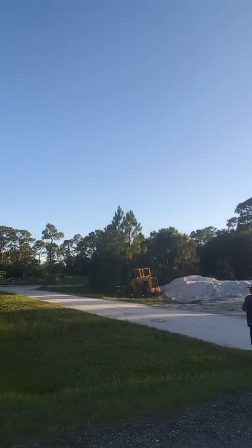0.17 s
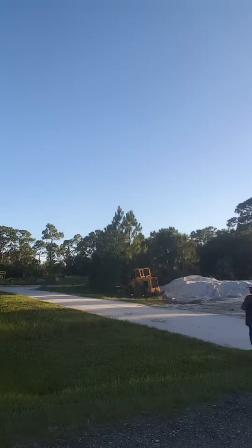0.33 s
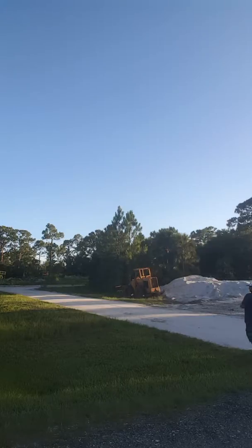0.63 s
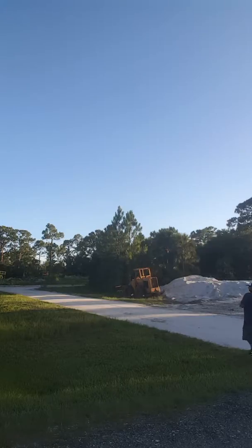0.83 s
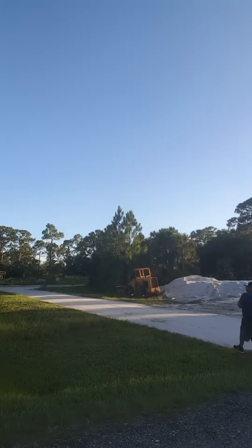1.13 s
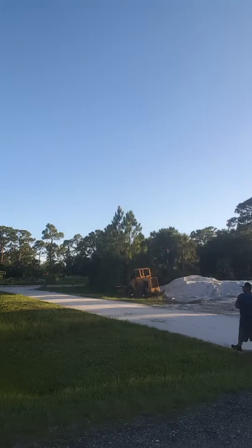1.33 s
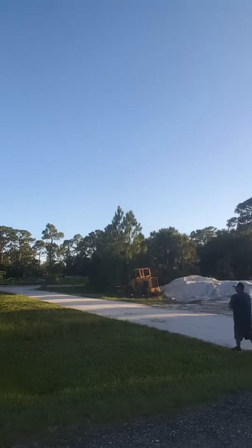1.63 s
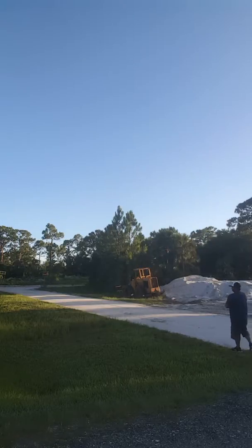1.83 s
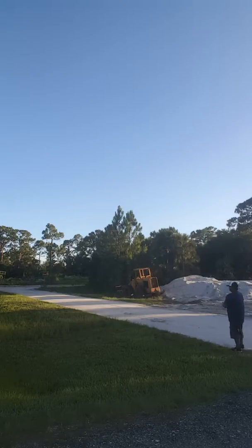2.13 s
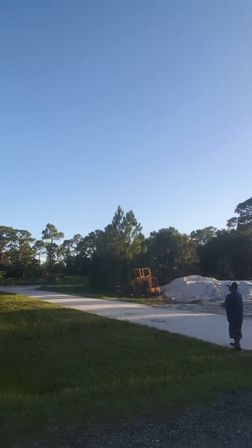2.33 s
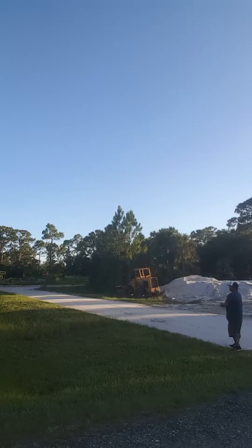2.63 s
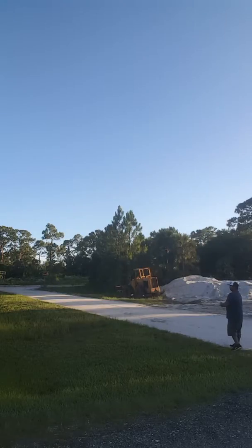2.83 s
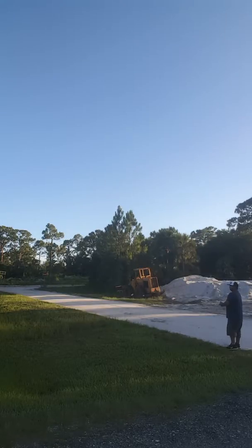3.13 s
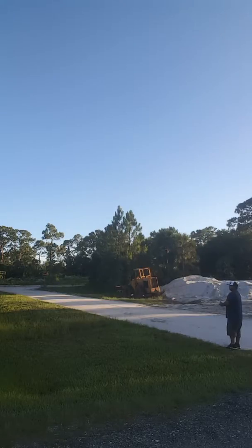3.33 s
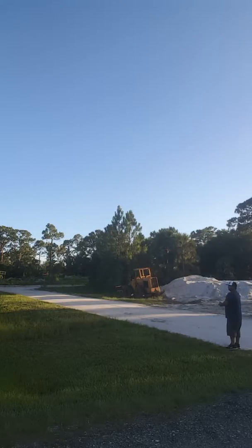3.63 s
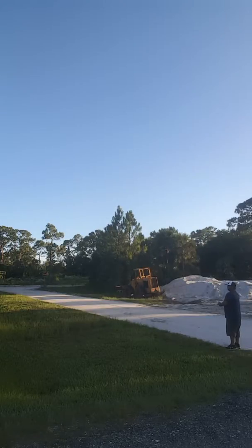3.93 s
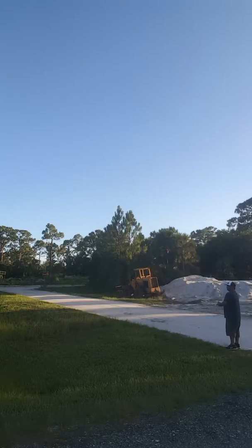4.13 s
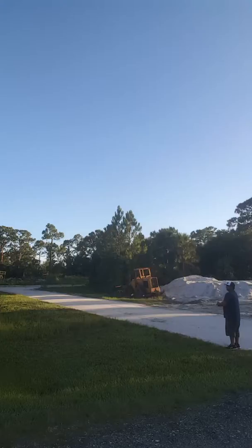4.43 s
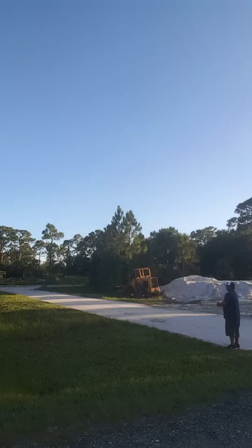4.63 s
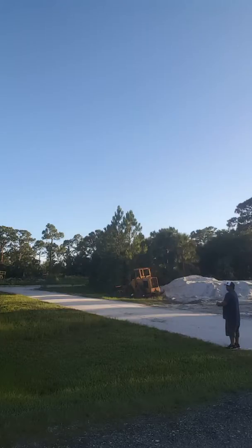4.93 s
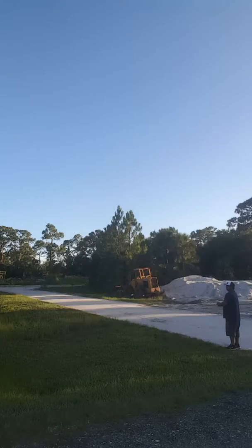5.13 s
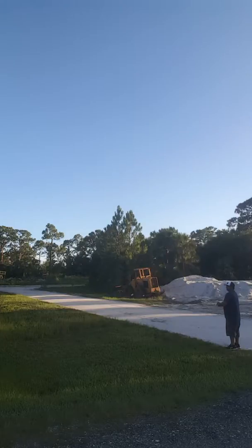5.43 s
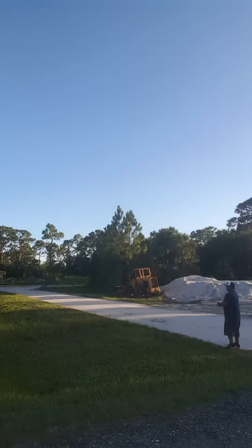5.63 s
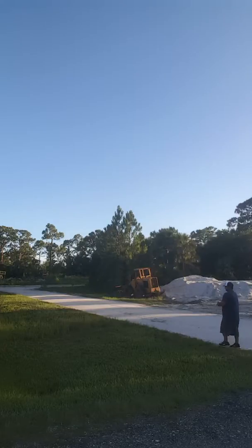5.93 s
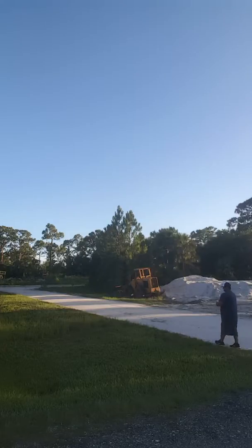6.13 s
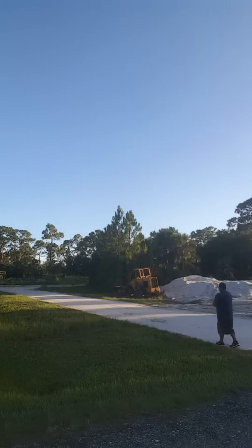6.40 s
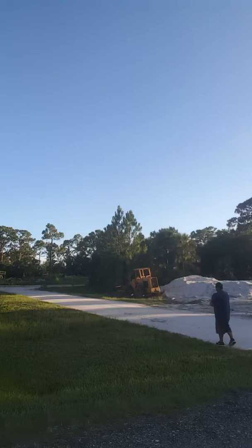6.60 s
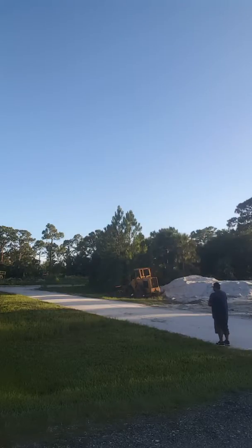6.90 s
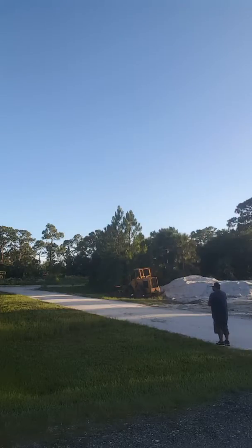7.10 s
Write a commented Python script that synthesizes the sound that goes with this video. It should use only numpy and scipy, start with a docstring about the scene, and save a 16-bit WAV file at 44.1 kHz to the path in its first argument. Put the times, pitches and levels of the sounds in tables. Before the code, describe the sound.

In an open field, a slate friction call close to the microphone makes short, hollow, raspy clucks, irregularly spaced, then from about four seconds a steady run of longer yelps breaking from high to low. Trees return a faint diffuse echo. Behind are a soft distant traffic rush, low engine hum, pulsing insects and tiny bird whistles. After the run, gravel crunches underfoot, and one faint cluck ends it.

```python
"""A wooden striker sticks and slips across a slate pot call in an open field: clucks, then a run of yelps.
The rubbed slate and its hollow pot color each note, and a tree line some metres away answers it.
Behind it: a far rush, hum and engine made of noise and wavering tones, and far insects made of noise bands.
A clicking cicada, a chirring cricket, a whistling bird and a few crunching gravel steps fill the evening."""
import sys
import numpy as np
from scipy import signal
from scipy.fft import rfft, irfft, next_fast_len
from scipy.io import wavfile
from scipy.ndimage import uniform_filter1d, map_coordinates

SR = 44100
rng = np.random.default_rng(int(sys.argv[2]) if len(sys.argv) > 2 else 0)


def dump(signal):
    """Clip the signal to [-1, 1] and save it as 16-bit WAV at the path in sys.argv[1]."""
    limited = np.clip(np.atleast_2d(signal).T, -1, 1)
    pcm = np.round(limited * 32767).astype(np.int16)
    wavfile.write(sys.argv[1], SR, pcm)


N = 320166
TIME = np.arange(N) / SR


def amp(db):
    """Turn decibels into a gain."""
    return 10 ** (np.asarray(db) / 20)


def unit(x):
    """Scale a sound to an rms (average strength) of 1."""
    return x / np.sqrt(np.mean(x ** 2) + 1e-20)


def along(points, hz):
    """Read a (frequency, value) table at any frequency, on a log frequency axis."""
    point_hz, value = np.transpose(points)
    return np.interp(np.log(hz + 1), np.log(point_hz + 1), value)


def curves(rows, t):
    """Read a table at the times t: one curve for each column after the first."""
    row_time, *columns = np.transpose(rows)
    return [np.interp(t, row_time, column) for column in columns]


def wobble(rate, size=N):
    """Make a smooth random curve with `rate` random points a second."""
    points = rng.standard_normal(int(size * rate / SR) + 4)
    return map_coordinates(points, [np.arange(size) * rate / SR])


def sine(hz):
    """A sine whose pitch follows the curve hz: adding up the pitch gives the phase."""
    return np.sin(2 * np.pi * np.cumsum(hz) / SR)


def filtered(x, response):
    """Multiply the spectrum of x by a response, given as a function of frequency."""
    size = next_fast_len(N + SR // 2)
    spectrum = rfft(x, size) * response(np.fft.rfftfreq(size, 1 / SR))
    return irfft(spectrum, size)[..., :N]


def band(x, centre_hz, width_hz):
    """Keep a band around one frequency, by applying the same resonance twice."""
    def resonance(f):
        damping = 1j * f * width_hz
        return (damping / (centre_hz ** 2 - f * f + damping)) ** 2
    return unit(filtered(x, resonance))


def placed(x, pan_db):
    """Place a sound between left and right; a positive pan makes the left louder."""
    return x * amp([[pan_db / 2], [-pan_db / 2]])


# Color of far traffic and leaves: (frequency [Hz], relative level [dB per Hz])
FIELD_COLOR = [(15, -44.5), (30, -17.5), (60, -5), (120, -5), (250, -8.5), (450, -15.5), (800, -18.5),
               (1600, -20.5), (3270, -27), (4500, -27), (6080, -36.5), (9350, -44), (15600, -49.5)]
# How alike left and right are: (frequency [Hz], likeness [0 to 1])
FIELD_LIKENESS = [(30, 0.93), (70, .96), (130, 0.97), (290, 0.95), (640, 0.77), (1410, .37), (3100, 0),
                  (15000, 0)]


def field():
    """Far traffic and leaves: colored noise, nearly mono in the bass, with slow patches."""
    spectrum = signal.stft(rng.standard_normal((2, N)), nperseg=512)[2]
    patches = rng.standard_normal(spectrum.shape[1:])
    patches = uniform_filter1d(patches, 6, 0)  # smooth across frequency
    patches = uniform_filter1d(patches, 14, 1)  # smooth across time
    pair = signal.istft(spectrum * amp(1.2 * unit(patches)), nperseg=512)[1][:, :N]

    def mid_side_gain(hz):
        # Shares of the common part (mid) and the left-right difference (side)
        angle = np.arccos(np.clip(along(FIELD_LIKENESS, hz), -1, 1)) / 2
        return amp(along(FIELD_COLOR, hz)) * [np.cos(angle), np.sin(angle)]

    mid, side = filtered(pair, mid_side_gain)
    level_db = -54 + 0.23 * wobble(0.91)
    return amp(level_db) * unit(np.array([mid + side, mid - side]))


def drone(hz, db):
    """A tone that wavers in pitch and strength on its long way through the air."""
    pitch_hz = hz * (1 + .008 * wobble(12))
    return amp(db + 2.5 + 2.53 * wobble(8)) * sine(pitch_hz)


# Hum lines of a far machine: (frequency [Hz], level before the drone's lift [dB])
HUM_LINES = [(120, -61), (204, -71), (240, -59), (280, -72.5), (333, -72)]
# A far engine, before the trims below: (time [s], first order level [dB], second order level [dB])
ENGINE_LEVELS = [(0.0, -61, -78), (0.75, -58.5, -58), (1.84, -59, -66), (2.32, -64.5, -71),
                 (3.84, -67.5, -68.5), (4.85, -60.5, -61), (6.09, -60, -59.5), (6.55, -60, -71),
                 (7.26, -68, -62)]


def machines():
    """Steady hum lines, and two engine orders (the second near twice the first) that come and go."""
    first_db, second_db = curves(ENGINE_LEVELS, TIME)
    hum = sum(drone(hz, db) for hz, db in HUM_LINES)
    engine = drone(80, first_db - 0.5) + drone(161, second_db - 2.5)
    return hum + engine


# Far insects, before a small trim: (time [s], low level [dB], middle level [dB], high level [dB])
CHORUS_LEVELS = [(0.0, -71, -75, -80), (0.62, -84, -73, -79), (0.99, -69, -77, -84), (3.01, -81, -76, -83),
                 (3.26, -71.5, -77, -79), (4.57, -66.5, -78.5, -72), (4.89, -63.5, -77, -73.5),
                 (5.58, -61, -77, -71), (6.13, -65.5, -75, -74.5), (6.89, -66, -75.5, -75.5),
                 (7.26, -67, -77, -74)]
# Their low, middle and high band: (centre [Hz], width [Hz], left over right [dB])
INSECT_BANDS = [(4870, 810, -4), (6975, 500, 3.5), (8930, 1400, 9)]


def chorus():
    """Many far insects blur into bands of noise, pulsing together at about 295 clicks a second."""
    out = np.zeros((2, N))
    click_hz = 295 + 3 * wobble(3.9)
    buzz = 1 + .5 * np.cos(2 * np.pi * np.cumsum(click_hz) / SR)
    for db, (hz, width_hz, pan_db) in zip(curves(CHORUS_LEVELS, TIME), INSECT_BANDS):
        insects = band(rng.standard_normal((2, N)), hz, width_hz)
        level = amp(db - 0.5 + wobble(4))
        out += placed(level * insects, pan_db) * buzz
    return out


# Louder swells of the cicada: (time [s], level above its drone [dB])
CICADA_SWELLS = [(.0, 8), (.9, 13), (1.82, 13.5), (2.62, 9.5), (3.44, 10.5), (4.29, 11.5), (5.2, 11.5)]


def cicada():
    """Each tymbal (sound plate) click rings the body; the ring's pitch glides up, holds and falls in a swell."""
    rise = sum(np.exp(-np.abs((TIME - s) / 0.11) ** 3) for s, db in CICADA_SWELLS)
    swell_db = sum(db * np.exp(-((TIME - s) / 0.095) ** 2) for s, db in CICADA_SWELLS)
    # Clicks fall out of step between swells
    click_hz = 279 + 1.5 * wobble(20) + 8 * (1 - rise) * wobble(250)
    clicks = np.cumsum(click_hz) / SR
    since_s = clicks % 1 / 279  # time since the last click
    decay_s = .0008 - .0003 * np.minimum(rise, 1)
    ring = np.sin(2 * np.pi * (4600 + 900 * rise) * since_s) * since_s
    ring *= np.exp(-since_s / decay_s)
    size_db = 2 * (-1) ** np.floor(clicks) + 2 * wobble(200)  # left and right tymbal take turns
    return placed(amp(-71.5 + swell_db) * unit(ring * amp(size_db)), pan_db=-6)


# Cricket loudness: (time [s], level [dB])
CRICKET_LEVEL = [(0.0, -79.5), (2.42, -78.5), (2.73, -80.5), (3.21, -79), (3.92, -82), (4.08, -80),
                 (5.2, -80), (5.22, -82), (5.34, -79), (6.61, -80.5), (7.26, -78)]
# Pitch during one wing stroke: (share of the period [0 to 1], frequency [Hz])
WING_PITCH = [(0, 9530), (.2, 9840), (.45, 9600), (.62, 9490), (.75, 8200)]


def cricket():
    """A near cricket on the left: in each wing stroke the pitch rises, holds and drops."""
    cycle = (68.65 * TIME + .5) % 1  # 68.65 wing strokes a second
    hz = curves(WING_PITCH, cycle)[0] * (1 + 0.0034 * wobble(400))
    fade_in = cycle / .06
    fade_out = (WING_PITCH[-1][0] - cycle) / 0.17
    gate = np.clip(np.minimum(fade_in, fade_out), 0, 1) * amp(1.6 * wobble(300))
    song = unit(gate * sine(hz))
    return placed(amp(curves(CRICKET_LEVEL, TIME)[0]) * song, pan_db=20.5)


# Whistles, before a fixed lift: (time [s], length [s], first pitch [Hz], last pitch [Hz], level [dB])
WHISTLES = [(.22, 0.06, 3950, 3500, -77), (.66, 0.063, 3950, 3500, -81), (1.11, 0.054, 3950, 3600, -82),
            (1.577, .1, 3250, 3330, -75), (2.235, 0.092, 3380, 3400, -75), (2.794, 0.083, 3350, 3340, -74),
            (3.493, 0.086, 3340, 3280, -74), (4.16, 0.1, 3320, 3300, -71)]


def bird():
    """A far bird: thin whistles, each a single tone gliding from one pitch to another."""
    out = np.zeros(N)
    for start_s, length_s, first_hz, last_hz, db in WHISTLES:
        progress = np.clip((TIME - start_s) / length_s, 0, 1)
        hz = first_hz + (last_hz - first_hz) * progress + 25 * wobble(60)
        out += amp(db + 3.5) * np.sin(np.pi * progress) * sine(hz)
    return placed(out, pan_db=13)


# Footfalls: (time [s], length [s], level before the ports [dB])
FOOTFALLS = [(0.086, 0.021, -54.5), (6.115, 0.098, -61), (6.456, 0.012, -54.5), (6.868, 0.094, -56.5)]
# Color of the crunch: (frequency [Hz], relative level [dB per Hz])
GRAVEL_COLOR = [(240, -36), (400, -18), (582, -13), (1020, -3), (1210, -10), (1710, -1), (4000, -19),
                (5200, -51), (8800, -120)]
# Single stones: (time [s], frequency [Hz], rough peak level before the ports [dB])
STONE_KNOCKS = [(6.133, 1150, -42.5), (6.172, 1240, -45), (6.191, 1130, -42)]


def steps():
    """Gravel crunches as scattered grains under each footfall; a few stones knock on their own."""
    weight = np.zeros(N)
    for start_s, length_s, db in FOOTFALLS:
        weight += amp(db) * np.sin(np.pi * np.clip((TIME - start_s) / length_s, 0, 1))
    grains = rng.standard_normal(N) * (rng.random(N) < .2)
    crunch = unit(filtered(grains, lambda hz: amp(along(GRAVEL_COLOR, hz))))
    knocks = np.zeros(N)
    for start_s, hz, db in STONE_KNOCKS:
        since_s = TIME - start_s
        bump = np.exp(-((since_s - .0015) / 0.00068) ** 2)
        knocks += amp(db) * bump * np.sin(2 * np.pi * hz * since_s)
    return crunch * weight + knocks


# The hollow pot: (frequency [Hz], gain [dB])
POT_GAIN = [(500, -39.5), (700, -26.5), (900, -23), (1100, -5.5), (1350, -2), (1600, 4), (1800, 3),
            (2050, -2), (2200, -16), (2350, -27), (3000, -39), (7000, -63.5), (9000, -91)]
# Ringing modes of the slate: (frequency [Hz], width [Hz], gain before the treble setting [dB])
SLATE_MODES = [(2670, 230, -18.5), (3380, 370, -16), (4300, 500, -25.5), (5230, 250, -34.5),
               (5870, 180, -48)]


def body(hz, treble_db):
    """Pot and slate together: a smooth pot gain plus resonance peaks of the slate."""
    modes = sum(amp(db) / (1 + (2 * (hz - centre) / width) ** 2) for centre, width, db in SLATE_MODES)
    return amp(along(POT_GAIN, hz)) + amp(treble_db) * modes


def stroke(rows, tilt_db, treble_db):
    """The tip sticks and slips; when every second slip is weaker, partials appear halfway."""
    t = np.arange(round(rows[0][0] * SR), round(rows[-1][0] * SR)) / SR
    size = len(t)
    slip_hz, db, half_db = uniform_filter1d(curves(rows, t), size=70)
    uneven = amp(np.minimum(half_db, 0))  # 1 where the half-rate partials are strong

    # Doubled periods are also less steady
    drift = .006 * wobble(50, size) + (.002 + .007 * uneven) * wobble(200, size)
    order = np.arange(2, 23)[:, None] / 2  # 1, 1.5, 2 ... 11 times the slip rate
    hz = order * slip_hz * (1 + drift)

    gain = body(hz, treble_db) * amp(tilt_db * np.log2(np.clip(hz, 1000, 2200) / 1700))
    gain[0] *= amp(5)  # the striker rod also swings at the slip rate
    full, half = gain[0::2], gain[1::2]
    gain[0::2] = full / np.linalg.norm(full, axis=0)
    gain[1::2] = half / np.linalg.norm(half, axis=0) * amp(half_db)
    # Grit upsets each partial, the high ones most
    flutter = np.array([wobble(150, size) for k in order])
    gain *= amp((.6 + .45 * order) * flutter)

    phase = 2 * np.pi * (np.cumsum(hz, axis=1) / SR + rng.random((len(order), 1)))
    tone = np.sqrt(2) * (gain * np.sin(phase)).sum(0)
    edge = np.minimum(1, np.minimum(t - t[0], t[-1] - t) / 0.0013)  # 1.3 ms fades
    pressure = amp(db) * (.15 + uneven) * edge
    level = amp(db + 0.49 * uneven * wobble(300, size))
    return tone * level * edge, pressure


# One table a stroke: (time [s], slip rate [Hz], level before pan and ports [dB],
# half-rate partials against the full-rate ones [dB])
STROKE_CURVES = [
    [(0.255, 1040, -59, -11), (0.261, 948, -28, -30), (0.266, 707, -44, 3), (0.27, 597, -25.5, -11),
     (0.277, 591, -33.5, 0), (0.3, 725, -42, 12.5), (0.31, 940, -37, -13), (0.319, 1020, -52, -12)],
    [(0.434, 1024, -52, -12), (0.439, 957, -23, -26), (0.445, 734, -35, -12), (0.449, 672, -24.5, -8),
     (0.479, 724, -35.5, 0.5), (0.487, 776, -28.5, -17), (0.494, 990, -39, -10), (0.501, 1020, -40, -12)],
    [(0.718, 1080, -42, -22), (0.727, 955, -20.5, -31), (0.733, 711, -33.5, 5), (0.739, 680, -24.5, 2),
     (0.759, 791, -29, -9.5), (0.763, 833, -35, -12), (0.769, 1050, -33, -9), (0.775, 1005, -51, -14)],
    [(1.034, 1035, -38, -33), (1.042, 973, -26.5, -35), (1.048, 708, -33, -24), (1.051, 658, -23.5, -16),
     (1.055, 675, -32, 6.5), (1.075, 735, -33.5, 3), (1.082, 827, -28.5, -20), (1.092, 1150, -42, -9)],
    [(1.376, 1024, -34, -37), (1.383, 910, -31, -33), (1.39, 708, -30, -11), (1.398, 654, -30.5, 3),
     (1.406, 750, -32.5, 4), (1.411, 718, -28, -3), (1.421, 1040, -36.5, -14), (1.432, 1050, -48, -19)],
    [(1.804, 1120, -78, -16), (1.809, 1018, -24.5, -23), (1.815, 755, -31, -16), (1.819, 640, -25, -43),
     (1.823, 653, -30, 5.5), (1.827, 715, -28, 8), (1.849, 718, -31.5, -9), (1.862, 920, -35, -15)],
    [(2.298, 916, -72, -10), (2.302, 933, -22.5, -12), (2.307, 731, -32.5, 7), (2.313, 659, -20, -6.5),
     (2.325, 747, -31.5, 7.5), (2.332, 752, -29, -1), (2.339, 934, -26, -23), (2.347, 970, -37, -22)],
    [(2.97, 1032, -56, -26), (2.977, 964, -24, -24), (2.986, 655, -26.5, -2), (2.99, 652, -24.5, 1),
     (2.996, 714, -29, 9), (3.014, 742, -28, -13), (3.024, 990, -38, -7), (3.029, 970, -42, -4)],
    [(3.569, 1115, -41, -24), (3.573, 1032, -29.5, -35), (3.579, 806, -25, -17.5), (3.588, 656, -23, 3.5),
     (3.592, 732, -31, 10.5), (3.602, 800, -24, -15), (3.61, 1046, -36, -9), (3.615, 1044, -40, -17)],
    [(4.02, 1018, -51.5, -15), (4.037, 914, -37, -30), (4.064, 877, -25.5, -28), (4.072, 678, -37.5, 8),
     (4.083, 648.5, -32, 3), (4.112, 686.6, -33, 10), (4.118, 651, -31, -10), (4.127, 716, -37, 13),
     (4.135, 720, -37, 3.5), (4.146, 827, -32.5, -11), (4.151, 1000, -50.5, -22), (4.16, 1030, -46, -7)],
    [(4.362, 1026, -67, -15), (4.367, 1050, -39.5, -28.5), (4.376, 904, -27, -38),
     (4.414, 870, -24.5, -36.5), (4.416, 873, -15, -21), (4.42, 698, -34, 7.5), (4.428, 647, -26, -6),
     (4.44, 683.5, -29.5, 8.5), (4.474, 734, -28.5, 2.5), (4.481, 806, -29, -21), (4.487, 1030, -39, -17.5),
     (4.494, 1046, -52, -17)],
    [(4.682, 1046, -46.5, -28), (4.69, 940, -23, -27), (4.694, 893, -25, -36), (4.742, 899, -22, -33.5),
     (4.744, 883, -16.5, -34), (4.746, 820, -28, -12), (4.748, 726, -33.5, 15), (4.755, 685, -22, -14.5),
     (4.783, 730, -31, 2), (4.789, 785, -23.5, -25), (4.799, 1060, -40, -6.5), (4.807, 1022, -58, -26)],
    [(5.0, 1033, -42.5, -26), (5.009, 935, -25.5, -37), (5.015, 909, -26.5, -42), (5.045, 897, -23, -25),
     (5.052, 709, -31, -2), (5.06, 665, -25, -15), (5.078, 681, -26, -4.5), (5.099, 712.5, -31.5, 9),
     (5.114, 740, -30, -2.5), (5.121, 820, -27, -26), (5.125, 970, -46, -19), (5.131, 1000, -52, -15)],
    [(5.322, 1036, -39, -8), (5.328, 893, -33, -26), (5.332, 863, -24.5, -43), (5.334, 858, -18.5, -34),
     (5.338, 752, -39.5, 7), (5.34, 682, -35.5, -2), (5.354, 725, -32.5, -23), (5.385, 670, -24.5, -28),
     (5.435, 731, -29.5, -5), (5.441, 812, -28, -30), (5.449, 1062, -42, -7), (5.454, 1022, -43, -15)],
    [(5.655, 1037, -54, -6), (5.663, 984, -36.5, -33), (5.686, 893, -28, -38), (5.708, 904, -24.5, -39),
     (5.715, 698, -34, 15.5), (5.724, 643, -25.5, -17), (5.729, 691, -30.5, 8), (5.746, 688.5, -25.5, -6.5),
     (5.781, 750, -36.5, 6.5), (5.789, 804, -30, -49), (5.795, 1045, -46, -12), (5.799, 1061, -55, -16)],
    [(7.222, 900, -67.5, -6), (7.224, 910, -72, -8), (7.229, 895, -47, -19), (7.238, 710, -46.5, -23),
     (7.244, 755, -40, -12), (7.248, 835, -54.5, -25), (7.253, 985, -46, -11), (7.257, 984, -63, -10)],
]
# How the hand cups and points the pot, one row a stroke:
# (tilt [dB per octave], treble of the slate modes [dB], left over right [dB])
HAND_GRIP = [(-4, -3.5, 0), (3.5, -6, -0.5), (2.5, -6, -1.5), (0, -2.5, -1), (-0.5, -4, -2), (0.5, -6, 0.5),
             (3.5, -4.5, -1), (-0.5, 1, 0.5), (-1, -0.5, -1), (0.5, -1.5, 0.5), (2, 0.5, -0.5),
             (2.5, 0, 3.5), (2, 2, 1), (3, -0.5, 1), (2, -1.5, 0), (0, -6, 1)]


def slate_call():
    """All strokes, each with a scrape of grit: noise that rings the same pot and slate."""
    call = np.zeros((2, N + SR))
    grit = unit(filtered(rng.standard_normal(N), lambda hz: body(hz, treble_db=1.5)))
    for rows, (tilt_db, treble_db, pan_db) in zip(STROKE_CURVES, HAND_GRIP):
        note, pressure = stroke(rows, tilt_db, treble_db)
        start = round(rows[0][0] * SR)
        end = start + len(note)
        scrape = amp(-17) * pressure * grit[start:end]
        call[:, start:end] = placed(note + scrape, pan_db)
    return call[:, :N]


# Caller to the right: (frequency [Hz], left over right [dB])
PORT_BALANCE = [(300, -1.5), (1400, -4), (2000, -1), (3500, -0.5), (7000, -5)]
LEFT_LAG_S = 1.2e-4  # the left port hears the caller this much later


def ports(x):
    """Two microphone ports hear the caller with unlike level and delay."""
    def left(hz):
        return amp(along(PORT_BALANCE, hz) / 2) * np.exp(-1j * np.pi * hz * LEFT_LAG_S)
    return filtered(x, lambda hz: np.array([left(hz), 1 / left(hz)]))


# How long the answer rings: (frequency [Hz], time to fall by 60 dB [s])
TREE_DECAY = [(500, .3), (1500, 0.72), (2500, 0.47), (6000, .3)]
# Open ground first, then the trunks: (delay [s], relative level before decay [dB])
ECHO_LEVELS = [(0, -8), (.045, -9), (.07, 0), (.11, -3), (.2, -1), (.5, 0)]


def trees(x):
    """Scattered, uneven answers of trunks and sand heaps; each frequency dies at its own speed."""
    hz, t, spectrum = signal.stft(rng.standard_normal((2, SR)), SR, nperseg=256)
    decay_db = -60 * t / along(TREE_DECAY, hz)[:, None]
    echo_db = curves(ECHO_LEVELS, t)[0] + decay_db
    tail = signal.istft(spectrum * amp(echo_db), SR, nperseg=256)[1]
    tail = tail + .4 * tail[::-1]  # each side leaks into the other
    tail *= amp(1.8 * wobble(70, size=tail.shape[1]))
    late = np.pad(x, (400, 0))[None]  # 400 samples, about 9 ms
    return signal.fftconvolve(late, tail * amp(-47.5), axes=1)[:, :N]


def scene():
    """Caller and steps reach the ports directly, the call once more off the trees."""
    call = slate_call()
    near = ports(call + steps()) + trees(call.mean(0))
    return near + field() + machines() + cricket() + chorus() + cicada() + bird()


def record(dry):
    """The microphones hiss a little; nothing is kept above the band limit."""
    hiss = amp(-74) * rng.standard_normal(dry.shape)
    return filtered(dry + hiss, lambda hz: hz < 15750)


dry = scene()
out = record(dry)
dump(out)
```